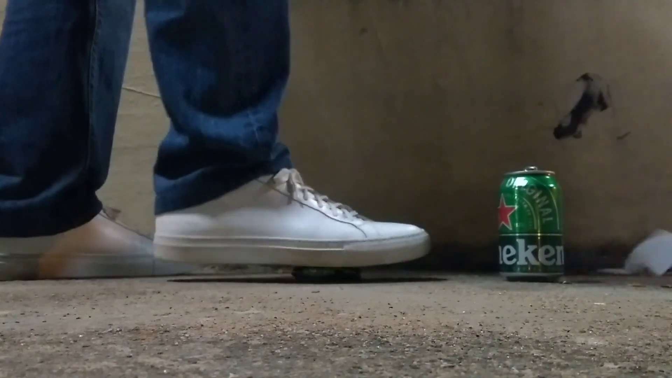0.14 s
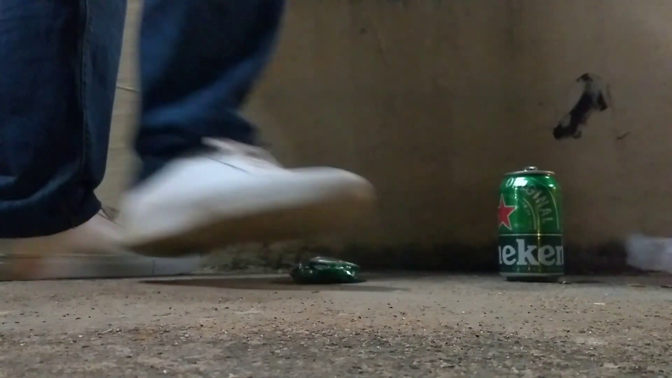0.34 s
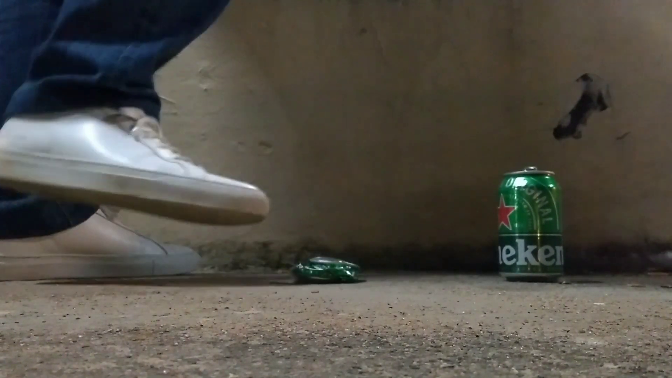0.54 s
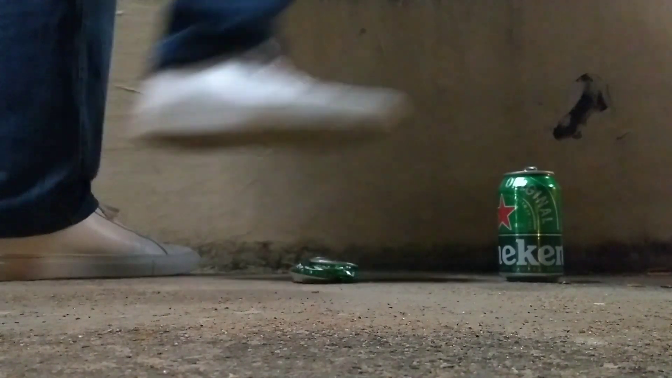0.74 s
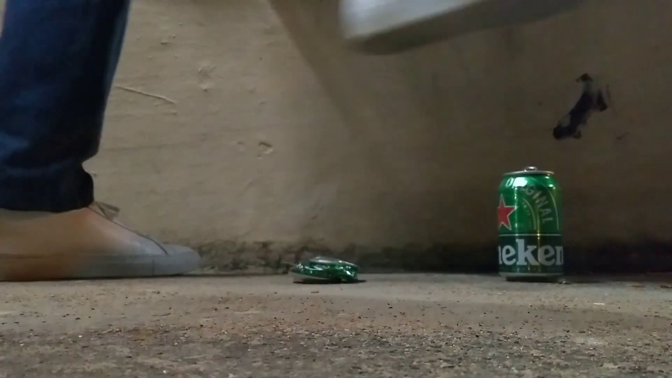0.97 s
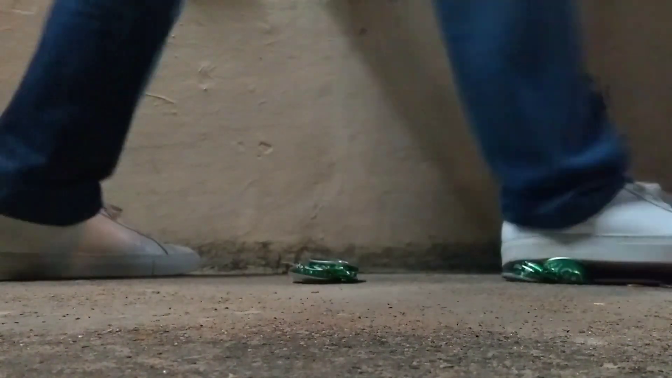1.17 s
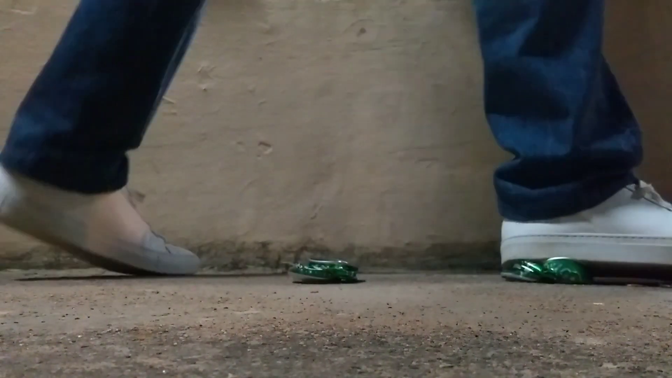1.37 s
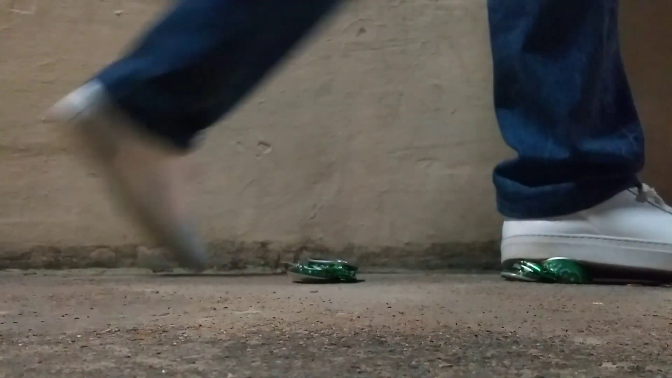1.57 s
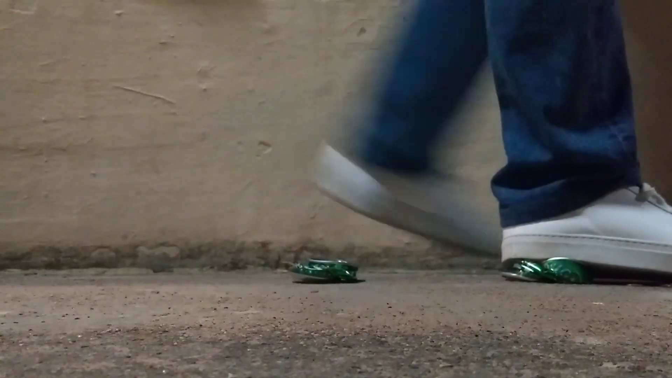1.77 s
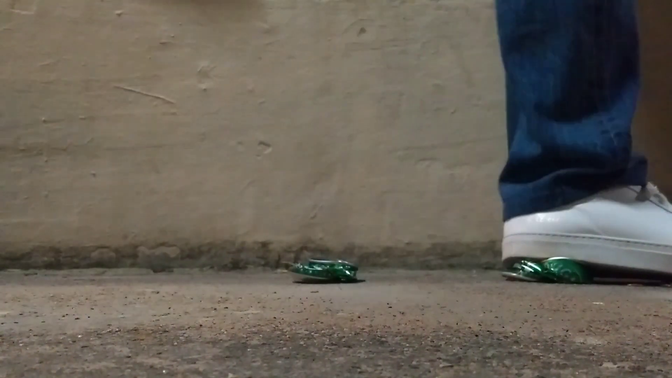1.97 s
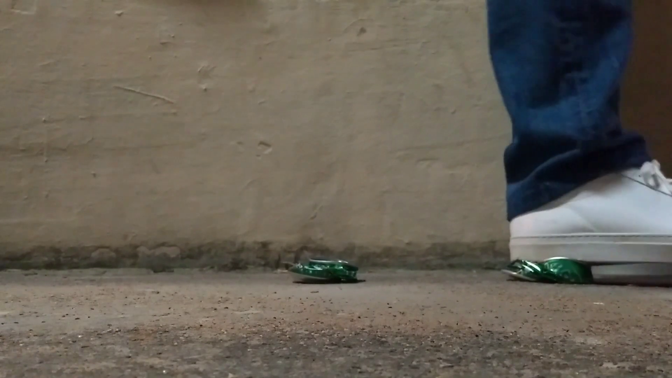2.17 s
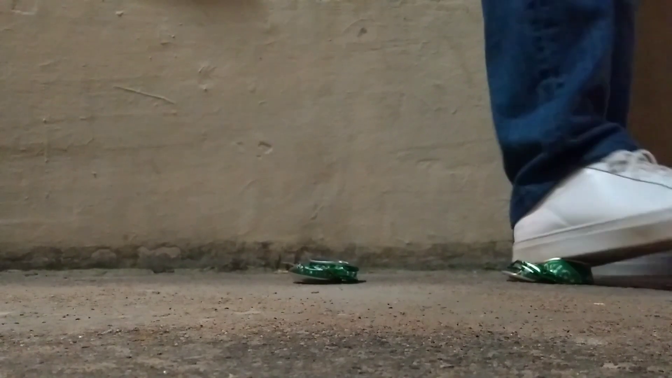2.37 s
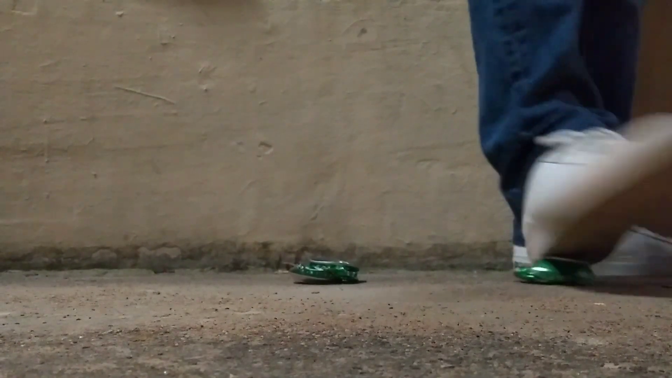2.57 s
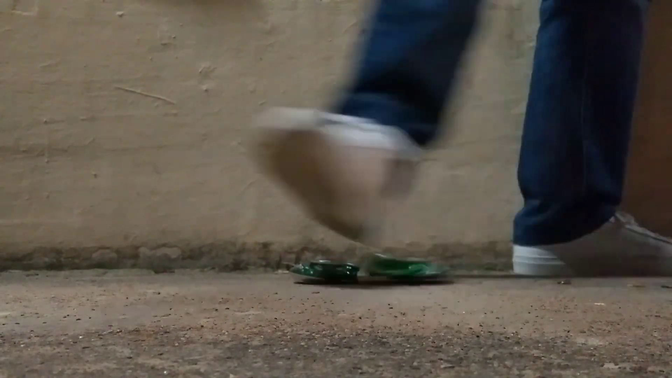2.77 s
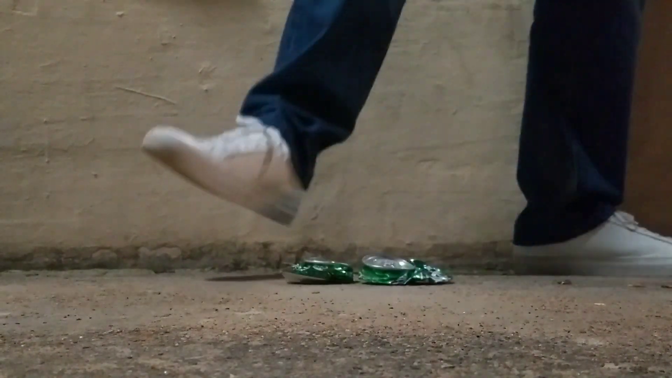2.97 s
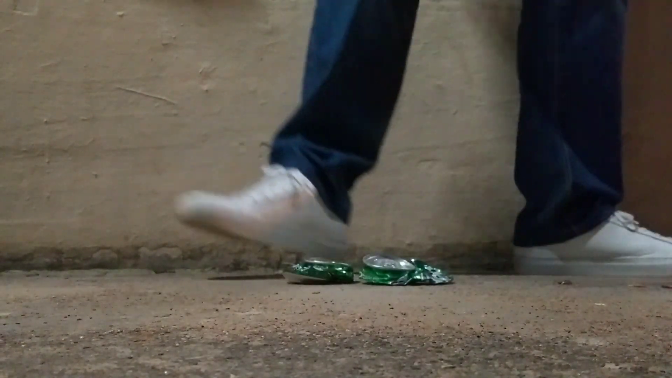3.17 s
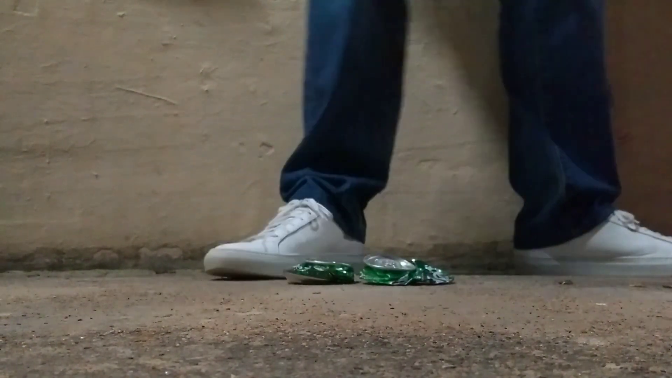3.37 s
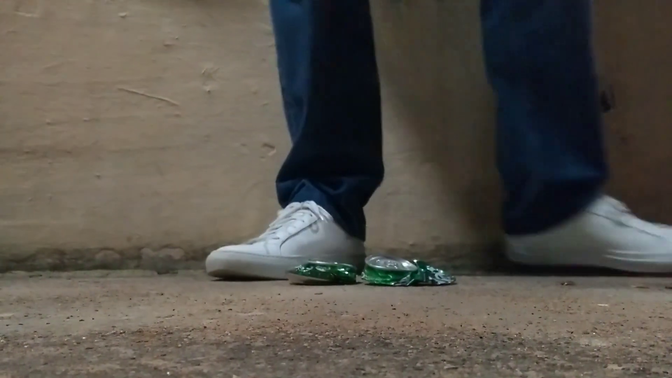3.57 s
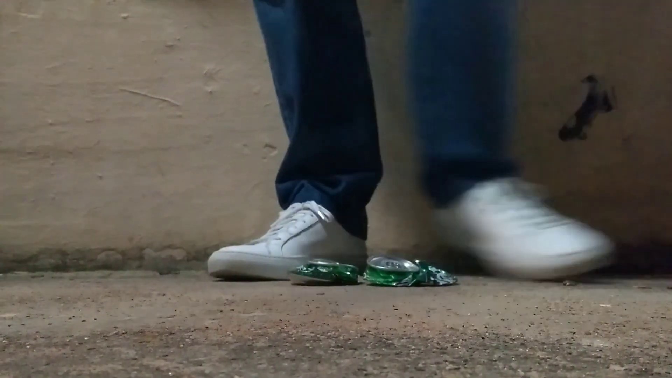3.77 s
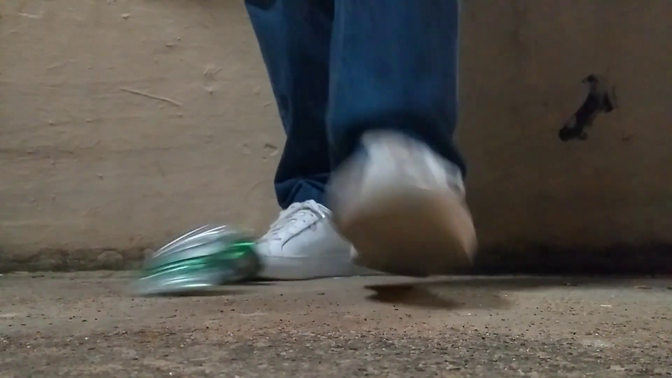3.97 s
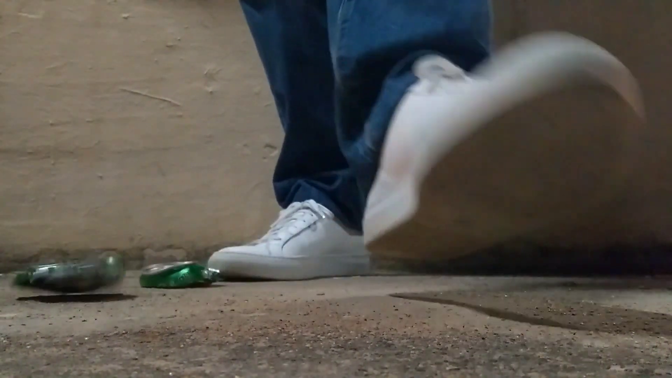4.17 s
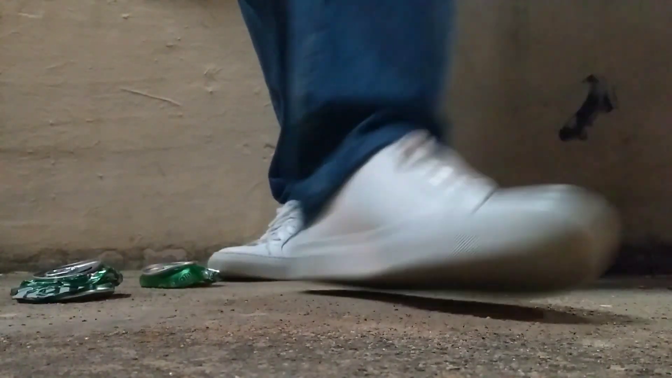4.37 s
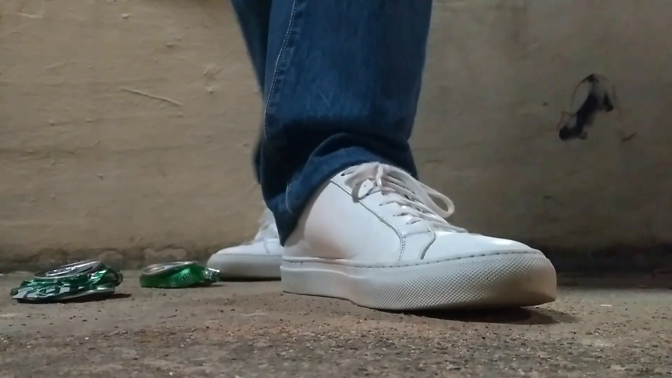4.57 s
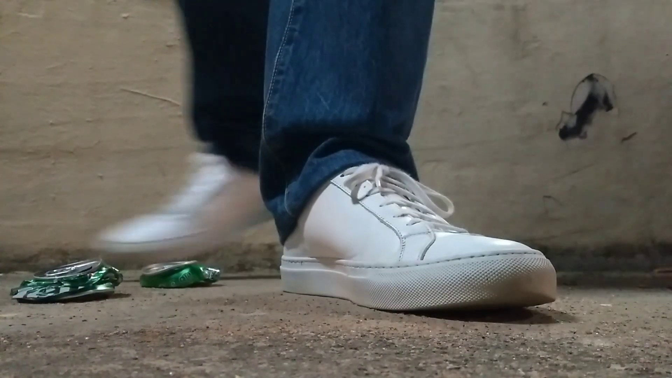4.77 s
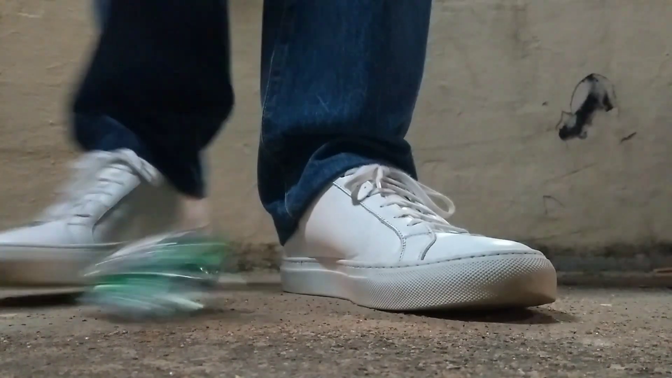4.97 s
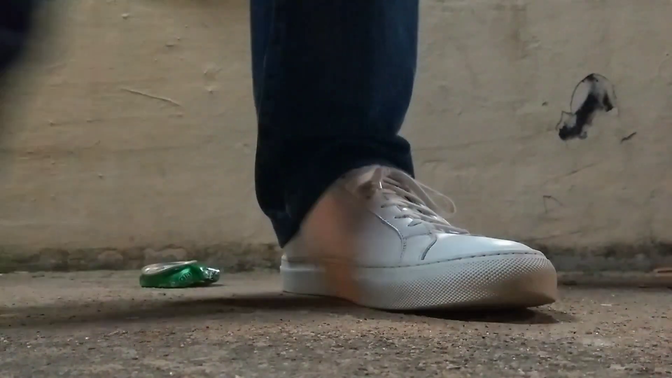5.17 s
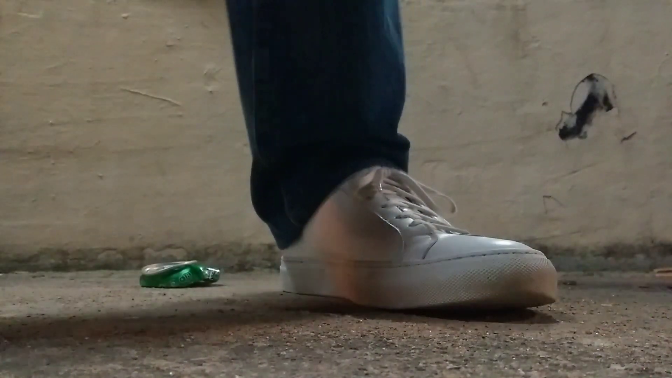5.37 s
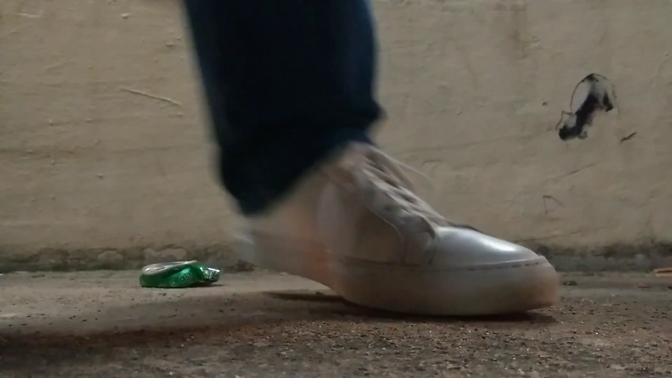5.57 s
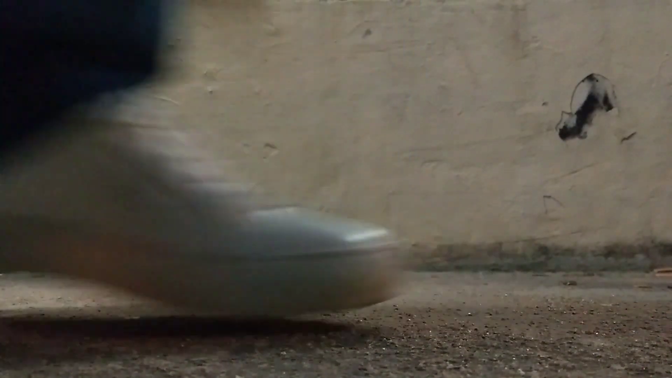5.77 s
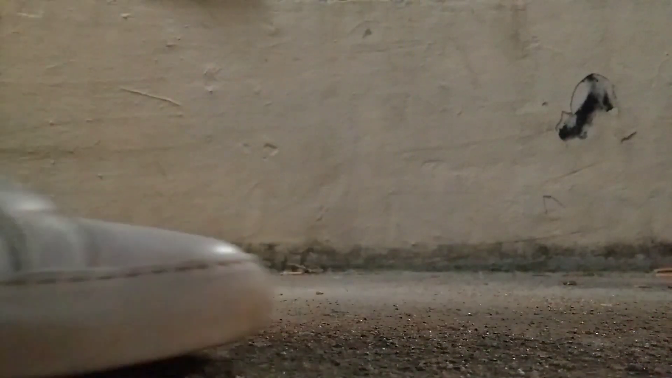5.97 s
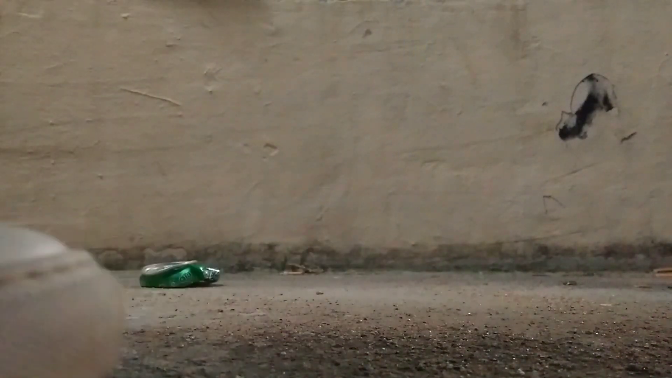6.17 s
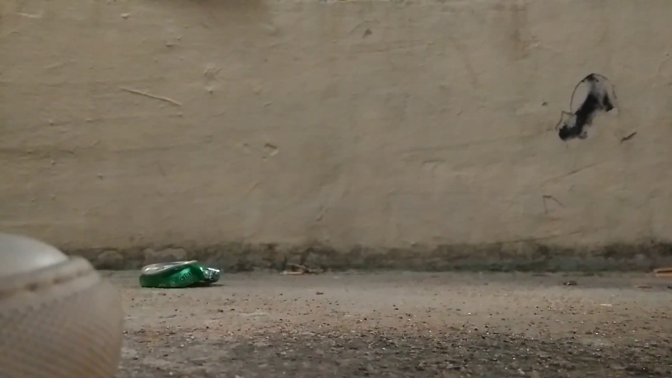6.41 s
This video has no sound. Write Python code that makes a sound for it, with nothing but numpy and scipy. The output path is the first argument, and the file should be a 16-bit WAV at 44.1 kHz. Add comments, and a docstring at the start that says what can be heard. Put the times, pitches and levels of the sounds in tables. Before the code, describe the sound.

An aluminium can is crushed underfoot in a quick crunch with a dull thump, following a faint tinny spring-back. After a gap with gritty ticks, the flattened can drops with rattling clinks, skids after a kick, then rings loudest in a second tumbling kick. Close microphone, nearly centred with slightly wide treble, dry with faint room reflections, over low roar and far engine hum.

```python
"""A concrete floor beside a wall: a shoe lifts off a flattened aluminium can and stomps a second one.
The crushed can drops and clatters, then is kicked twice and tumbles over the concrete.
Each metal contact is a burst of tiny snaps that rings a set of can modes; the slides are rubbed noise and grains.
Grit ticks under the shoes; behind lie a steady roar of filtered noise, a thin hiss and a far, wavering engine tone.
A faint diffuse tail and a scattered treble give the close sounds their room and width."""
import sys
import numpy as np
from scipy import signal
from scipy.fft import rfft, irfft, next_fast_len
from scipy.io import wavfile
from scipy.ndimage import uniform_filter1d

SR = 44100
rng = np.random.default_rng(int(sys.argv[2]) if len(sys.argv) > 2 else 0)


def log_audio(samples):
    """Write samples as a 16-bit WAV file to the path given in sys.argv[1]."""
    # one column per channel
    frames = np.atleast_2d(samples).T
    # limit to full scale, then quantise
    limited = np.clip(frames, -1, 1)
    pcm = np.round(limited * 32767).astype(np.int16)
    wavfile.write(sys.argv[1], SR, pcm)


N = 284004
TIME = np.arange(N) / SR
HIT_TIME = TIME[:SR // 14]
LEVEL_WINDOW = SR // 100   # a contact's level is its energy spread over 10 ms
CUTOFF_HZ = 16000


def from_db(db):
    """Decibels to gain."""
    return 10 ** (np.asarray(db) / 20)


def rms_one(x):
    """Scale to unit power."""
    return x / np.sqrt(np.mean(x ** 2) + 1e-20)


def at_level(x, db):
    """Scale a short sound to a contact level."""
    return x * from_db(db) * np.sqrt(LEVEL_WINDOW / (np.sum(x ** 2) + 1e-20))


def in_time(rows):
    """Join curve rows by straight lines."""
    s, *columns = np.transpose(rows)
    return [np.interp(TIME, s, c) for c in columns]


def cut(x, kind, hz, order=2):
    """Causal Butterworth filter."""
    hz = np.clip(hz, 10, .45 * SR)
    return signal.sosfilt(signal.butter(order, hz, kind, fs=SR, output="sos"), x)


def add(track, s, sound):
    """Mix a sound in at a time."""
    start = int(s * SR)
    track[start:start + len(sound)] += sound[:N - start]


def coloured(x, spectrum):
    """Shape a sound by a spectrum, straight on a log-frequency axis."""
    hz, db = np.transpose(spectrum)
    size = next_fast_len(N + SR // 10)
    log_hz = np.log(np.fft.rfftfreq(size, 1 / SR) + 1)
    gain = from_db(np.interp(log_hz, np.log(hz), db))
    return irfft(rfft(x, size) * gain, size)[:N]


def sprinkled(spans, count, spread_db, fade_db=0):
    """Chance moments inside spans, with levels that fade along each span: (t/s, level/dB)."""
    start, length, db = np.transpose(spans)
    pick, place, size = rng.random((count, 3)).T
    k = np.searchsorted(np.cumsum(length) / np.sum(length), pick)   # longer spans get more
    level = db[k] - fade_db * place + spread_db * (2 * size - 1)
    return zip(start[k] + place * length[k], level)


# spectral density of the roar: (f/Hz, relative level/dB)
ROAR_SPECTRUM = [(25, -23.5), (38, -8.5), (50, 4.5), (70, 5), (100, 2), (200, -3.5), (400, -6.5), (600, -4),
                 (900, -1.5), (1300, -4), (1700, -11.5), (2400, -23.5), (5000, -36.5), (16000, -57)]


def roar(level_db=-30.5):
    """Steady roar of air: noise shaped to a low-heavy spectrum."""
    return from_db(level_db) * rms_one(coloured(rng.standard_normal(N), ROAR_SPECTRUM))


# slow fall of the thin hiss almost to nothing, then its return: (t/s, level/dB)
HISS_LEVEL = [(0, -49.5), (.5, -52.5), (1.1, -53.5), (1.6, -57.5), (2.3, -63), (3.2, -81.5), (4.8, -91),
              (5.8, -60.5), (6.44, -53)]


def hiss(low_hz=1900, high_hz=7000, top_hz=9000):
    """Thin hiss: gently band-limited noise riding a slow level curve."""
    band = cut(rng.standard_normal(N), "band", [low_hz, high_hz], order=1)
    return from_db(in_time(HISS_LEVEL)[0]) * rms_one(cut(band, "low", top_hz))


# far engine: (t/s, f/Hz, level before the waver/dB)
ENGINE = [(0, 59, -32.5), (.2, 67.7, -38.5), (.45, 69.5, -38.5), (.72, 66.8, -30.5), (.9, 59.3, -41),
          (1.9, 64.85, -40), (2.4, 65.85, -44), (3.3, 70.25, -43.5), (4.1, 68, -43.5), (5.1, 63.3, -90),
          (5.5, 67.1, -36), (5.75, 72.8, -31), (6.0, 65.8, -64), (6.44, 64.7, -34.5)]


def engine_drone(waver_db=3.5, waver_hz=7):
    """A far engine: one sine of gliding pitch whose level wavers slowly at random."""
    pitch, level_db = in_time(ENGINE)
    waver = rms_one(cut(rng.standard_normal(N), "low", waver_hz))
    tone = np.sin(2 * np.pi * np.cumsum(pitch) / SR)
    return np.sqrt(2) * from_db(level_db + waver_db * waver) * tone


# the can slides on the concrete after a drop or a kick: (t/s, length/s, relative starting level/dB)
CAN_SLIDES = [(2.617, .17, -26.5), (2.818, .13, -32.5), (3.875, 0.08, -31), (4.032, .41, -27),
              (5.102, 0.1, -35), (5.298, 0.087, -39), (5.442, 0.044, -19), (5.585, 0.14, -31.5)]
SLIDE_ATTACK_S, SLIDE_STOP_S, SLOWING_DB = .015, .018, 11.5   # a slide loses this much as the can slows


def sliding():
    """Level of all slides: each starts quickly, fades as the can slows, and stops."""
    total = np.zeros(N)
    for s, length, db in CAN_SLIDES:
        age = np.maximum(TIME - s, 0)
        attack = np.minimum(age / SLIDE_ATTACK_S, 1)
        slowing = from_db(db - SLOWING_DB * np.minimum(age / length, 1))
        stop = np.exp(-np.maximum(age - length, 0) / SLIDE_STOP_S)
        total += slowing * attack * stop
    return total


# shoes and trousers brush, or the can's edge scuffs the sand, swelling and fading:
# (middle t/s, half length to 1/e/s, relative level/dB)
BRUSH_SWELLS = [(0.242, 0.027, -27), (1.253, .04, -35.5), (1.333, .04, -47), (1.993, 0.049, -52),
                (2.124, .04, -45.5), (2.458, 0.023, -36.5), (2.569, 0.031, -39), (2.645, .022, -32),
                (3.337, .02, -52.5), (3.894, .02, -29), (4.067, 0.046, -36), (4.259, 0.018, -37),
                (4.99, 0.015, -23), (5.136, 0.014, -20.5), (5.312, 0.015, -15.5), (5.46, 0.014, -26),
                (5.62, 0.042, -38), (6.34, 0.093, -56)]


def brushing(low_hz=3400, high_hz=12500, grain_db=4, slide_hiss_db=-12.5):
    """Rubber, cloth and the sliding can rub: noise with a fast random level makes a fine, grainy rustle."""
    flutter = rms_one(cut(rng.standard_normal(N), "low", 250))
    grains = rng.standard_normal(N) * from_db(grain_db * flutter)
    swells = sum(from_db(db) * np.exp(-((TIME - s) / half) ** 2) for s, half, db in BRUSH_SWELLS)
    slides = from_db(slide_hiss_db) * sliding()   # the sandy hiss lies below the slides' ringing
    return (swells + slides) * rms_one(cut(grains, "band", [low_hz, high_hz]))


def ring(hz, t60, phase=0):
    """A struck mode dying away."""
    return np.sin(2 * np.pi * hz * HIT_TIME + phase) * from_db(-60 * HIT_TIME / t60)


def crackle(length, snaps_per_s, spread_db, rattle_db=-25, rattle_s=0.0082, rise_s=0.00047):
    """Force of one contact: it builds, a flurry of creases gives way, then comes a faint loose rattle."""
    size = len(HIT_TIME)
    moments = rng.random(size) < snaps_per_s / SR
    strength = from_db(spread_db * (2 * rng.random(size) - 1))
    snaps = moments * rng.choice([-1, 1], size) * strength
    press = np.exp(-(HIT_TIME / max(length, .0005)) ** 2)
    rattle = from_db(rattle_db) * np.exp(-HIT_TIME / rattle_s)
    return snaps * (press + rattle) * (1 - np.exp(-HIT_TIME / rise_s))


def shell(modes, crack_db, facet_db, damping, scatter_db=2, detune=.015, facet_low_hz=2400,
          facet_t60=0.024, count=64):
    """One blow's ring: the can's modes, the small crumpled facets at the spot struck, and a bare crack."""
    mode_hz, mode_db, mode_t60 = np.transpose(modes)[:, :, None]
    strength, bend, place = rng.standard_normal((3, len(modes), 1))
    mode_gain = np.sign(place) * from_db(mode_db + scatter_db * strength)
    sound = np.sum(mode_gain * ring(mode_hz * (1 + detune * bend), mode_t60 / damping), axis=0)
    facet_hz = rng.uniform(facet_low_hz, CUTOFF_HZ, (count, 1))
    facets = rng.standard_normal((count, 1)) * ring(facet_hz, facet_t60 / damping)
    sound += from_db(facet_db) * np.sum(facets, axis=0)
    sound[0] += from_db(crack_db)
    return sound


# single grains cracking under a sole or a can: (t/s, relative level/dB)
GRAINS = [(.194, -14), (1.2955, -25), (2.033, -20.5), (2.1344, -26), (2.0915, -27), (2.4044, -13.5),
          (2.4204, -24.5), (2.551, -15.5), (2.9382, -35.5), (3.3353, -36), (3.8394, -26), (5.9695, -32.5),
          (6.1707, -34)]
# a sole grinds on sand, which ticks at random: (t/s, length/s, relative level/dB)
SOLE_GRINDS = [(1.955, 0.25, -32), (2.9, .22, -44), (2.41, .16, -26), (5.8, 0.082, -35), (5.72, .26, -51)]
# modes of a crushed can, also rung by grit, scraping and clatter:
# (nominal f/Hz, relative level/dB, t60 before damping/s)
CRUSHED_CAN = [(301, -27.5, 0.0078), (544, -4.5, 0.022), (668, -6, 0.065), (764, -8, 0.046),
               (1057, -0.5, 0.076), (1200, -4, .03), (1250, 9, 0.011), (1624, 3.5, 0.015),
               (2007, -2, 0.029), (2223, -10.5, 0.031), (2670, -1, 0.01), (2913, -24.5, 0.023),
               (3510, -17.5, 0.0099), (3924, -0.5, 0.01), (5350, -7, 0.021), (7540, 2, 0.02),
               (8400, -5.5, 0.041)]


def grit(low_hz=3000, high_hz=15000, gain_db=-13):
    """Grains of sand and small creases crack in bright ticks, each with a tiny ring of its own."""
    out = np.zeros(N)
    for s, db in [*GRAINS, *sprinkled(SOLE_GRINDS, count=28, spread_db=4)]:
        force = crackle(0.0012, snaps_per_s=6300, spread_db=12)
        tick = signal.fftconvolve(force, shell(CRUSHED_CAN, crack_db=10.5, facet_db=-5, damping=1.3))
        add(out, s, at_level(cut(tick, "band", [low_hz, high_hz]), db + gain_db))
    return out


def scraping(grains_per_s=2500, spread_db=6, low_hz=1200, high_hz=5000, count=4):
    """Sand grains under the sliding rim keep the can's shell ringing, struck at several spots."""
    rung = np.zeros(N)
    for spot in range(count):
        moments = rng.random(N) < grains_per_s / count / SR
        strength = from_db(spread_db * rng.standard_normal(N).clip(-2, 2))
        grains = moments * rng.standard_normal(N) * strength
        struck = shell(CRUSHED_CAN, crack_db=14.5, facet_db=-30.5, damping=1.3)
        rung += signal.oaconvolve(grains, struck)[:N]
    return sliding() * rms_one(cut(rung, "band", [low_hz, high_hz], order=1))


# a shoe's blow or the falling can knocks on the floor: (t/s, relative level/dB, decay/s)
FLOOR_KNOCKS = [(1.133, -6.5, 0.0097), (1.151, -7.5, 0.0053), (2.615, -23, 0.0079), (4.03, -21.5, .005),
                (4.965, -14, 0.0062)]


def thuds(low_hz=150, high_hz=520, weight_hz=55, weight_db=-12, weight_t60=0.077):
    """A dull slap of rubber, can and concrete in decaying noise, with a low, longer thump of weight."""
    out = np.zeros(N)
    for s, db, decay in FLOOR_KNOCKS:
        push = rng.standard_normal(len(HIT_TIME)) * np.exp(-HIT_TIME / decay)
        slap = at_level(cut(push, "band", [low_hz, high_hz]), db)
        weight = at_level(ring(weight_hz, weight_t60), db + weight_db)
        add(out, s, slap + weight)
    return out


BODY_TOP_HZ, CLANK_TOP_HZ = 2300, 6900   # a contact splits into body, clank and sizzle
# contacts harder or brighter than a firm one sizzle higher, softer ones lower
FIRM_SIZZLE_TOP_HZ, SIZZLE_HZ_PER_DB, FIRM_DB = 11000, 190.5, -13.5


def can(contacts, modes, snaps_per_s, spread_db, stretch, crack_db, facet_db, damping, lower_db, upper_db,
        panel_t60, bottom_hz, clank_db, sizzle_db, upper_hz, upper_scatter):
    """Each contact crackles into the can's shell; the two panels nearest to it ring most."""
    sounds = []
    for row in contacts:
        force = crackle(row[1] * stretch, snaps_per_s, spread_db)
        struck = signal.fftconvolve(force, shell(modes, crack_db, facet_db, damping))
        sounds.append(struck[:len(HIT_TIME)])
    bodies = cut(sounds, "low", BODY_TOP_HZ, order=4)
    bodies = cut(bodies, "high", bottom_hz, order=1)   # a small shell radiates little bass
    clanks = cut(sounds, "band", [BODY_TOP_HZ, CLANK_TOP_HZ], order=3)
    sizzles = cut(sounds, "high", CLANK_TOP_HZ, order=4)
    out = np.zeros(N)
    swell = 1 - np.exp(-HIT_TIME / 0.0011)
    for (s, length, db, bright_db, panel_hz), body, clank, sizzle in zip(contacts, bodies, clanks, sizzles):
        lower_panel = swell * ring(panel_hz, panel_t60)
        body = at_level(body, 0) + at_level(lower_panel, lower_db)
        upper_panel_hz = upper_hz * np.exp(upper_scatter * rng.uniform(-1, 1))
        upper_panel = swell * ring(upper_panel_hz, panel_t60)
        clank = at_level(clank, 0) + at_level(upper_panel, upper_db)
        sizzle_top_hz = FIRM_SIZZLE_TOP_HZ + SIZZLE_HZ_PER_DB * (db + bright_db - FIRM_DB)
        sizzle = cut(sizzle, "low", sizzle_top_hz)
        treble = at_level(clank, clank_db) + at_level(sizzle, sizzle_db)
        add(out, s, at_level(body, db) + from_db(db + bright_db) * treble)
    return out


# the flat can springs back as the shoe lifts:
# (t/s, crackle length before stretch/s, relative level/dB, brightness/dB, panel f/Hz)
SPRING_BACKS = [(.227, 0.014, -17.5, -2.5, 1620), (.2355, 0.0071, -21, -3, 1620),
                (.243, 0.0027, -18, -6, 1690), (.249, 0.0027, -13.5, 5, 1650)]
# modes of the older flat can: (nominal f/Hz, relative level/dB, t60 before damping/s)
FLAT_CAN_MODES = [(690, -29, 0.014), (950, 2, 0.0448), (1370, -9.5, 0.046), (1640, -8.5, 0.026),
                  (1890, -9, .025), (2100, -8, .025), (2560, -2.5, .03), (3150, -7.5, 0.0515),
                  (5770, 7, 0.027), (6200, 11, .03)]


def release():
    """Freed of the shoe, the flat can's sheet springs back in a few crackles."""
    return from_db(-2.0) * can(
        SPRING_BACKS, FLAT_CAN_MODES, snaps_per_s=5000, spread_db=-2.5, stretch=1.0, crack_db=32.0,
        facet_db=-10, damping=0.72, lower_db=-2, upper_db=-16.5, panel_t60=0.02, bottom_hz=500,
        clank_db=-7, sizzle_db=-21.0, upper_hz=2520, upper_scatter=.05)


# the standing can folds at full force until it is down, is pressed flat more quietly,
# then the last creases die away; times run from the first fold
STOMP_S, STOMP_DB, FOLD_GAP_S = 1.1308, -7.5, .0062
FOLD_LENGTH_S = 0.0028   # before stretch
COLLAPSE_S, LANDING_S, LANDING_DROP_DB = 0.021, .008, 15
PRESS_S, SETTLE_DB_PER_S = 0.052, 886
FOLD_BRIGHT_DB, BRIGHTEN_DB_PER_S, FOLD_PANEL_HZ = 6.5, 111, 1065   # the flatter the can, the brighter


def folds(count=13, jitter_s=0.0015, spread_db=2, detune=0.14):
    """The wall of the standing can buckles in a quick run of contacts."""
    late, size, bend = rng.uniform(-1, 1, (count, 3)).T
    age = FOLD_GAP_S * np.arange(count) + jitter_s * (late - late[0])
    landed = np.clip((age - COLLAPSE_S) / LANDING_S, 0, 1)
    settling_db = SETTLE_DB_PER_S * np.maximum(age - PRESS_S, 0)
    db = STOMP_DB - LANDING_DROP_DB * landed - settling_db + spread_db * size
    bright_db = FOLD_BRIGHT_DB + BRIGHTEN_DB_PER_S * age
    panel_hz = FOLD_PANEL_HZ * (1 + detune * bend)
    return np.transpose([STOMP_S + age, np.full(count, FOLD_LENGTH_S), db, bright_db, panel_hz])


# modes of the standing can as it folds: (nominal f/Hz, relative level/dB, t60 before damping/s)
FOLDING_CAN_MODES = [(261, 9.5, 0.014), (387, -7, 0.01), (540, -5, .018), (763, 2.5, 0.024),
                     (980, -4, 0.035), (1190, 6.5, 0.02), (1180, 3.5, 0.051), (1620, -0.5, .016),
                     (1980, -12.5, 0.014), (2615, -3.5, .02), (3426, -2, .015), (3930, -1, 0.025),
                     (4550, -2, 0.032), (5300, 6, .018), (8540, -4, .035), (10300, 5, 0.02)]


def stomp():
    """The run of folds rings the can's wall, strongly damped."""
    return from_db(3.0) * can(
        folds(), FOLDING_CAN_MODES, snaps_per_s=4000, spread_db=11.5, stretch=1.97, crack_db=26.0,
        facet_db=-8.5, damping=3.9, lower_db=-16, upper_db=-7.0, panel_t60=0.035, bottom_hz=162,
        clank_db=-9.0, sizzle_db=-8.0, upper_hz=4490, upper_scatter=0.18)


def touches(above_slide_db=1, length_s=.006, bright_db=1, panel_hz=1160, detune=0.14):
    """Light contacts of the rocking rim, weaker as each slide slows."""
    contacts = []
    for s, db in sprinkled(CAN_SLIDES, count=26, spread_db=0, fade_db=SLOWING_DB):
        bent_hz = panel_hz * (1 + detune * rng.uniform(-1, 1))
        contacts.append((s, length_s, db + above_slide_db, bright_db, bent_hz))
    return contacts


# the crushed can drops, is kicked and tumbles:
# (t/s, crackle length before stretch/s, relative level/dB, brightness/dB, panel f/Hz)
TUMBLES = [(2.118, 0.0033, -23.5, 5, 1245), (2.441, 0.0041, -18, 1, 1405), (2.455, .003, -24, 5, 1320),
           (2.585, .004, -22.5, 6, 1940), (2.594, 0.0033, -21.5, 4, 1530), (2.601, 0.0038, -12.5, 4, 1280),
           (2.614, 0.017, -6, 5, 1920), (2.627, 0.013, -6.5, 0.5, 1210), (2.644, 0.0055, -10.5, -2.5, 1150),
           (2.655, 0.0043, -8.5, -6, 1140), (2.681, 0.0051, -9, -11, 1730),
           (2.692, 0.0019, -12, -2.5, 1140), (2.722, 0.0068, -13.5, -13, 1680),
           (2.73, 0.0084, -17.5, -11, 1550), (2.751, .004, -19, -4, 1150), (2.776, .003, -20, -9, 1170),
           (2.813, 0.0038, -18.5, -2.5, 1560), (2.832, .006, -28, 3, 1310),
           (2.848, 0.0054, -22.5, -7, 1560), (3.873, 0.0067, -6, 1.5, 1366), (3.897, .002, -19, 0.5, 1337),
           (3.913, .006, -19.5, -5.5, 1180), (3.945, .003, -24.5, -3, 1290),
           (3.97, 0.0089, -19, -7.5, 1260), (4.012, 0.0055, -23, -19, 1210), (4.026, .003, -22.5, 6, 1220),
           (4.029, 0.0053, -7.5, 3.5, 1385), (4.052, .003, -15.5, 3.5, 1180),
           (4.058, 0.0035, -18, -2, 1190), (4.066, 0.0023, -20, 4, 1140), (4.084, 0.002, -16, -11.5, 1230),
           (4.096, 0.0011, -15.5, -2, 1100), (4.115, .005, -19, 1, 990), (4.13, 0.0028, -17, -9, 1180),
           (4.143, .003, -27, 8, 910), (4.173, 0.0013, -20, -2, 1120), (4.196, .004, -19.5, -1, 1230),
           (4.231, 0.00059, -13.5, -5.5, 1220), (4.26, 0.0043, -20.5, 1, 1290),
           (4.295, .002, -18, -7, 1230), (4.305, 0.0016, -19, -0.5, 1000), (4.333, 0.0029, -22.5, 4, 1070),
           (4.372, .005, -26, -6, 1160), (4.9655, 0.0035, -3, 4, 943), (4.9975, 0.0032, -15.5, -1.5, 2130),
           (5.0425, 0.0011, -7.5, -1, 970), (5.1, 0.0074, 3.5, -8.5, 1044), (5.128, 0.0025, -2.5, 0, 1030),
           (5.1685, .003, -2.5, 0, 1200), (5.188, 0.0069, -3.5, 7.5, 1210),
           (5.2005, 0.0049, -3, -3.5, 1060), (5.214, .005, -5, 0, 1215), (5.2505, 0.0035, -11.5, 9.5, 1220),
           (5.289, 0.01, 0.5, 6, 1220), (5.316, 0.0048, -6.5, -6, 1280), (5.35, 0.0078, -6.5, 6.5, 1160),
           (5.365, 0.0063, -7.5, 1.5, 2100), (5.397, .003, -11.5, 1.5, 1040), (5.432, 0.003, -6, 2, 1997),
           (5.457, .008, -7, -0.5, 970), (5.48, 0.0048, -11, 3.5, 1240), (5.51, 0.0053, -17.5, -1, 1060),
           (5.556, 0.0018, -19, -0.5, 1270), (5.579, 0.0088, -10, 4.5, 990), (5.593, 0.0022, -17, 2, 1110),
           (5.616, 0.0024, -20, -14, 1220), (5.637, 0.0062, -23, -9, 1290), (5.651, .0035, -24, -2, 1438),
           (5.668, 0.00068, -18.5, 7.5, 1190), (5.692, 0.0033, -21, -2.5, 1310)]


def clatter():
    """The crushed can's crumpled shell rings at every knock and rim touch on the concrete."""
    return from_db(-1.42) * can(
        [*TUMBLES, *touches()], CRUSHED_CAN, snaps_per_s=6000, spread_db=2, stretch=0.99, crack_db=27.5,
        facet_db=-6.5, damping=1.47, lower_db=-2.0, upper_db=-5, panel_t60=0.018, bottom_hz=410,
        clank_db=-6.5, sizzle_db=-7.5, upper_hz=3208, upper_scatter=0.273)


def room(x, level_db=-25, build_s=0.0028, low_hz=400, split_hz=6300, top_hz=11000, t60_s=0.47,
         treble_t60_s=0.34):
    """A faint diffuse tail from bare walls: decaying noise in two bands."""
    t = TIME[:SR]
    dull, bright = rng.standard_normal((2, SR)) * (1 - np.exp(-t / build_s))
    dull = cut(dull, "band", [low_hz, split_hz]) * from_db(-60 * t / t60_s)
    # air soaks up the treble sooner
    bright = cut(bright, "band", [split_hz, top_hz]) * from_db(-60 * t / treble_t60_s)
    tail = dull + bright
    return from_db(level_db) * signal.fftconvolve(x, tail / np.sqrt(np.sum(tail ** 2)))[:N]


def width(x, side_db=-14, scatter_s=.003, above_hz=5300):
    """The treble scatters differently into the two channels; lower sound is the same in both."""
    t = TIME[:SR // 150]
    scatter = rng.standard_normal(len(t)) * t * np.exp(-2 * t / scatter_s)
    phase = np.angle(rfft(scatter, 2 * len(t)))
    even = irfft(np.exp(1j * phase))[:len(t)]   # all pitches scatter about equally strongly
    side = from_db(side_db) * signal.oaconvolve(cut(x, "high", above_hz, order=10), even)[:N]
    return np.array([x + side, x - side])


# colour of the close pickup: (f/Hz, level/dB)
PICKUP_COLOUR = [(100, -5.5), (600, -2), (1500, -1), (2200, 0.5), (2400, -5), (3000, 1.5), (6000, -3),
                 (10700, -1.5), (11700, -6.5), (16000, -9)]


def scene():
    """Cans, shoes and grit close by, in the room, over the background."""
    background = roar() + hiss() + engine_drone()
    rubbing = brushing() + grit() + scraping()
    blows = thuds() + release() + stomp() + clatter()
    near = coloured(rubbing + blows, PICKUP_COLOUR)
    return width(near + room(near)) + background


def record(dry, top=0.72, bass_hz=38):
    """Loud cracks overload the microphone; the deepest bass and the top are cut."""
    mid = dry.mean(axis=0)
    squeeze = (1 + (mid / top) ** 4) ** (-1 / 4)
    side = (dry - mid) * uniform_filter1d(squeeze, SR // 500)   # gain smoothed over 2 ms
    steep = signal.ellip(10, .1, 70, CUTOFF_HZ, fs=SR, output="sos")
    return signal.sosfilt(steep, cut(mid * squeeze, "high", bass_hz) + side)


dry = scene()
out = record(dry)
log_audio(out)
```